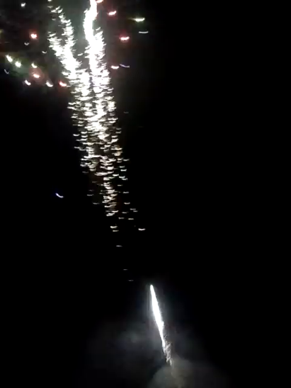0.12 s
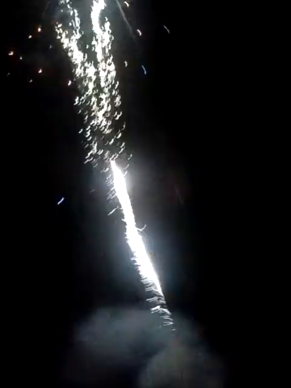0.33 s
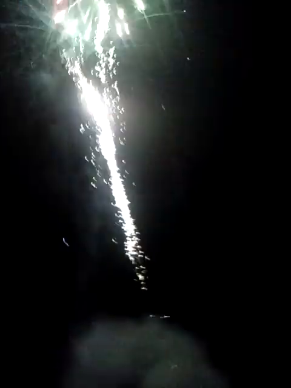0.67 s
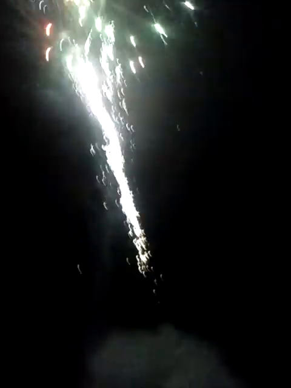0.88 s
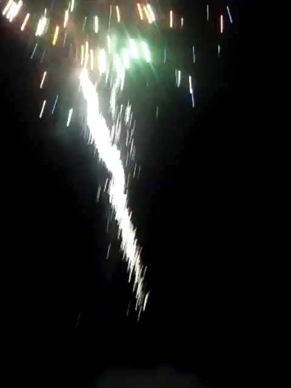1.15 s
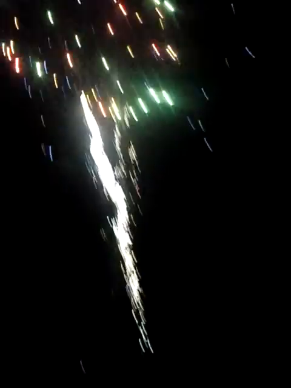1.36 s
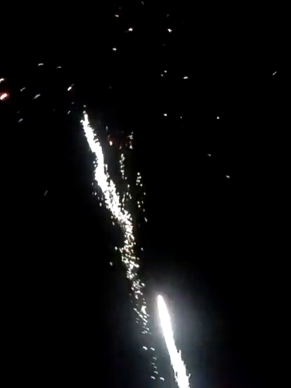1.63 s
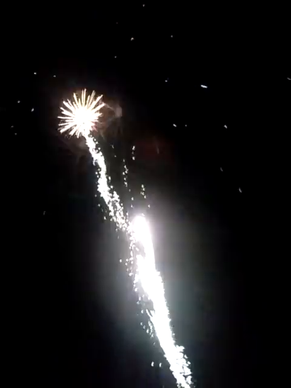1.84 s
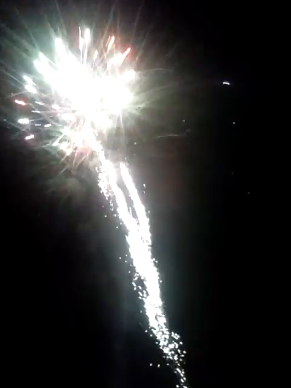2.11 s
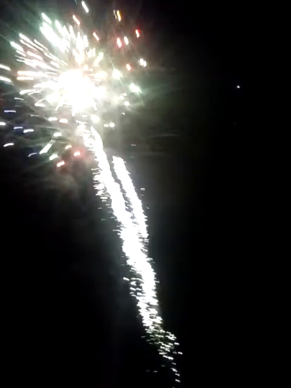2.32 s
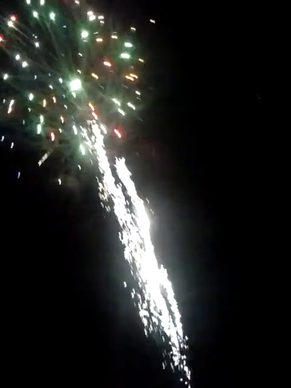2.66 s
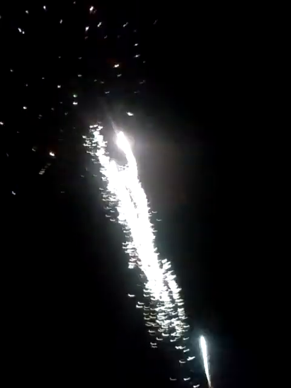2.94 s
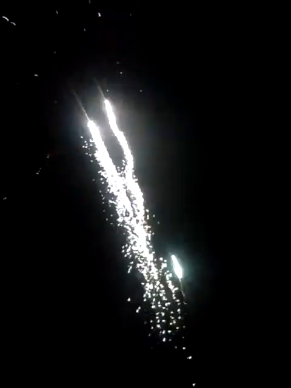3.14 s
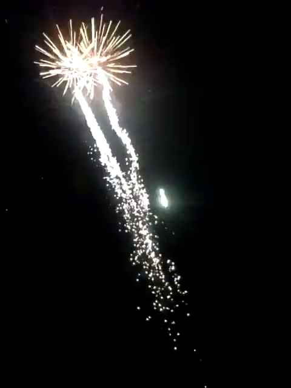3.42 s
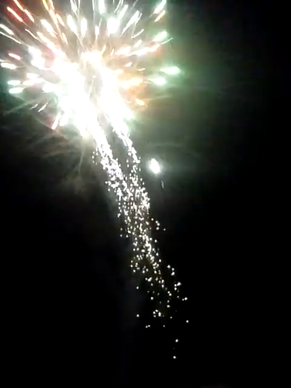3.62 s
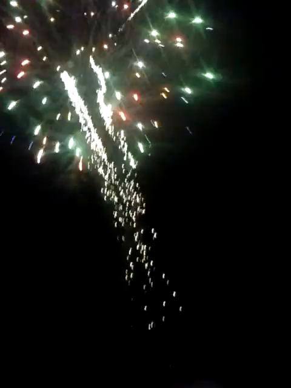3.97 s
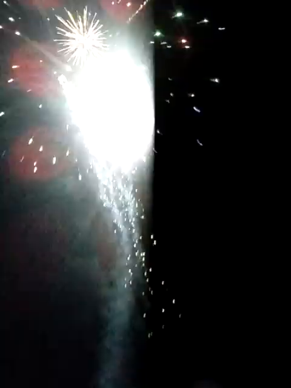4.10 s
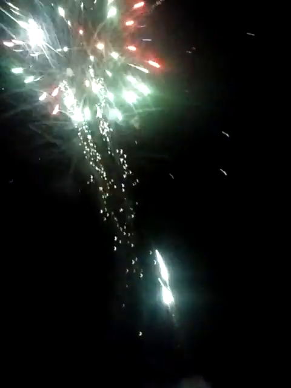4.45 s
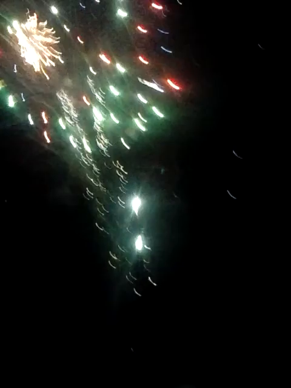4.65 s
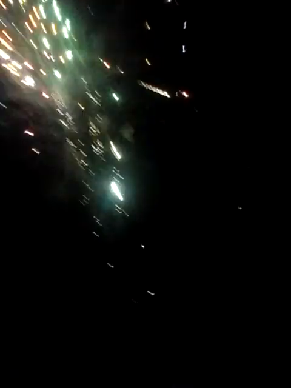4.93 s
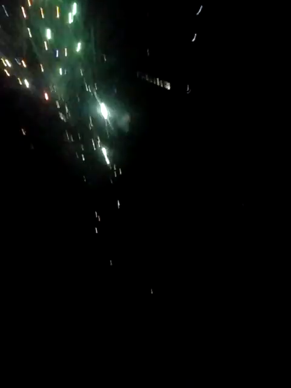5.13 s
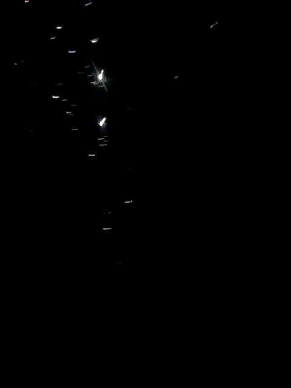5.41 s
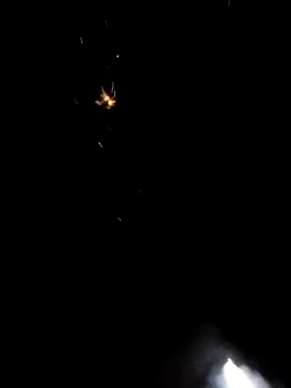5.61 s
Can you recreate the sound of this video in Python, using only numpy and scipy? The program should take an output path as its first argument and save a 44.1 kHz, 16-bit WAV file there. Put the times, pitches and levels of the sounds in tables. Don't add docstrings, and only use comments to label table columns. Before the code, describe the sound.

A battery of small fireworks fires in clusters: short hollow tube thumps with sharp cracks, then dry, ragged overhead bangs about half a second later. Muffled slaps return from houses, over low rolling rumble and fine sizzling crackle. A distant battery thuds weakly in the second half and one rocket whistles faintly. The mono phone sound is narrow, without bright treble, and overloads flat on the blasts.

```python
import sys
import numpy as np
from scipy import signal
from scipy.fft import rfft, irfft
from scipy.io import wavfile
from scipy.ndimage import uniform_filter1d

SR = 44100
rng = np.random.default_rng(int(sys.argv[2]) if len(sys.argv) > 2 else 0)


def rack_gain(trim_db):
    fader = np.asarray(trim_db, float)
    return 10 ** (fader / 20)


def to_wav(sig):
    pcm = np.clip(np.atleast_2d(sig), -1, 1) * 32767
    pcm = np.round(pcm).astype(np.int16)
    wavfile.write(sys.argv[1], SR, pcm.T)


N = 254893
T = np.arange(SR // 2) / SR

# start_s, tube_hz, thump_db, crack_db, gas_jet_db
LIFTS = [
    (0.1864, 186, 0.5, 11.5, -5),
    (0.3649, 186, 0, 7, -3),
    (1.5566, 190, 4, 5.5, -3.5),
    (1.7123, 207, 0, 23.5, -1.5),
    (2.46, 192.3, 6.5, 11, -0.5),
    (2.5784, 194, 0.5, 15, -9.5),
]
# start_s, tube_hz, thump_db, crack_db, gas_jet_db
FAR_LIFTS = [
    (2.8372, 194, -12.5, -11, -10),
    (4.1877, 203, -13.5, -6, -11.5),
    (4.2772, 205, -9, -0.5, -9.5),
    (5.7117, 186, -8.5, 0, -10.5),
]
# start_s, extra path in s by the ground, by the near wall, by the far wall
BURSTS = [
    (.7125, .0099, .233, .441),
    (1.094, .0103, .231, .456),
    (2.1141, .0102, .241, .44),
    (2.508, .0103, .232, .439),
    (3.6427, .0103, .236, .448),
    (3.699, .0105, .237, .447),
    (4.3753, .0105, .234, .454),
    (4.4294, .0096, .256, .44),
    (4.9078, .0105, .232, .435),
]
BURST_DB = [9.6, 7.7, 9.2, 6.9, 10.5, 8.9, 9.1, 15.4, 2.05]


def band(x, hz, width):
    edges = np.clip([hz * 2 ** (-width / 2), hz * 2 ** (width / 2)], 10, .45 * SR)
    return signal.sosfilt(signal.butter(2, edges, "bandpass", fs=SR, output="sos"), x)


def low(x, hz):
    return signal.sosfilt(signal.butter(2, hz, fs=SR, output="sos"), x)


def split(x, centres):
    octave = np.log2(np.maximum(np.arange(len(x) // 2 + 1) * SR / len(x), 1))
    nodes = np.log2(np.concatenate([[centres[0] / 2], centres, [centres[-1] * 2]]))
    masks = [np.interp(octave, nodes, row) for row in np.eye(len(nodes))[1:-1]]
    return irfft(rfft(x) * np.array(masks), len(x))


def unit(x):
    return x / np.sqrt(np.mean(x ** 2))


def add(out, s, x):
    i = int(s * SR)
    out[i:i + len(x)] += x[:max(N - i, 0)]


def grains(size, spread_db):
    strength = np.minimum(rng.exponential(size=size), 4)
    return rng.standard_normal(size) * rack_gain(spread_db * strength)


def walk(rate):
    k = int(SR / rate)
    steps = np.repeat(rng.standard_normal(N // k + 1), k)
    return 1.3 * uniform_filter1d(uniform_filter1d(steps, k), k)[:N]


def blast(hz, fade, shape, late):
    return -np.cos(2 * np.pi * hz * T + late) * np.exp(-(T / fade) ** shape)


def scatter(table, place, fresh, rise):
    echoes = np.sqrt(1 - fresh) * place + np.sqrt(fresh) * grains(len(T), spread_db=0.5)
    hz, db, t60 = np.transpose(table)
    tail = 0
    for part, level_db, t60_s in zip(split(echoes, hz), db, t60):
        early = rack_gain(level_db - 60 * T / t60_s)
        late = rack_gain(level_db - 7.5 - 24 * T / t60_s)
        tail = tail + (early + late) * unit(part)
    return tail * (1 - np.exp(-(T / rise) ** 2))


def bed(table, source, flicker_db, rate):
    hz, db = np.transpose(table)
    return unit(sum(rack_gain(d + flicker_db * walk(rate)) * b for b, d in zip(split(source, hz), db)))


def afterglow():
    # after_lift_db, after_burst_db, rise_s, fall_db_per_s, night_floor_db
    glow = (-34, -28.5, 0.2, 30, -61.5)
    lift_db, burst_db, rise_s, fall, floor_db = glow
    shots = [(shot[0], lift_db) for shot in LIFTS + FAR_LIFTS]
    shots += [(-0.11, burst_db)]
    shots += [(shot[0], burst_db + 0.3 * (db - 9.5)) for shot, db in zip(BURSTS, BURST_DB)]
    s, db = np.transpose(shots)[:, :, None]
    t = np.arange(0, N / SR + .01, .005)
    age = np.maximum(t - s, 0)
    left = rack_gain(2 * (db - fall * age)) * (1 - np.exp(-age / rise_s))
    power = rack_gain(2 * floor_db) + np.sum(left, axis=0)
    return np.interp(np.arange(N) / SR, t, 10 * np.log10(power))


def air():
    # band_hz, density_db (per Hz)
    rumble_bands = [(40, -27), (70, 5), (113, 4.5), (230, 9.5), (400, 5), (600, 1.5), (850, -20)]
    # band_hz, density_db (per Hz)
    sizzle_bands = [(700, 10.5), (1500, 12), (2350, 13.5), (3300, 8), (4500, 6), (5100, 0), (6100, 4.5),
                    (7200, -4)]
    # time_s, sizzle_db
    tails = [(0, -49.5), (.2, -52.5), (.7, -53), (.92, -50), (1.45, -50.5), (1.9, -52.5), (2.22, -50.5),
             (2.9, -51), (3.1, -53), (3.64, -57.5), (3.78, -49), (4.1, -50.5), (4.3, -52), (4.5, -47.5),
             (4.88, -50.5), (5.26, -52), (5.78, -56)]
    # time_s, pitch_hz, level_db
    rocket = [
        (3.82, 616, -70),
        (3.899, 665, -59),
        (3.97, 695, -56),
        (4.15, 705, -65),
        (4.19, 690, -85),
    ]
    t = np.arange(N) / SR
    rumble_db, sizzle_db = afterglow(), np.interp(t, *np.transpose(tails))
    rumble = bed(rumble_bands, rng.standard_normal(N) * rack_gain(2.1 * walk(64)), flicker_db=2.5, rate=6.1)
    sizzle = bed(sizzle_bands, grains(N, spread_db=0.4) * rack_gain(0.86 * walk(14)), flicker_db=1.66, rate=11)
    dull = low(sizzle, 3500)
    sizzle = dull + rack_gain(1.1 * (sizzle_db + 52)) * (sizzle - dull)
    time_s, hz, db = np.transpose(rocket)
    pitch = np.interp(t, time_s, hz) * (1 + 0.014 * walk(47))
    whistle_db = np.interp(t, time_s, db, left=-200, right=-200) + 6
    whistle = rack_gain(whistle_db) * np.sin(2 * np.pi * np.cumsum(pitch) / SR)
    return rack_gain(rumble_db - 8.0) * rumble + rack_gain(sizzle_db + 3.0) * sizzle + whistle


def thuds():
    # start_s, peak_db, pitch_hz
    strays = [(0.007, -28.5, 270), (0.067, -53, 200), (1.266, -36, 410), (2.99, -61, 149),
              (3.101, -45, 153), (3.831, -30.5, 232), (4.638, -31, 377), (5.428, -38, 282),
              (5.428, -36, 1820), (5.491, -48, 417)]
    # lag_s, level_db, pitch_hz
    lift_echoes = [(.31, -39, 250), (.429, -45, 153)]
    # lag_s, level_db, pitch_hz
    burst_echoes = [(.352, -41, 285)]
    out = np.zeros(N)
    echoes = [(shot[0] + lag, db, hz) for shot in LIFTS for lag, db, hz in lift_echoes]
    echoes += [(shot[0] + lag, db - 8, hz) for shot in FAR_LIFTS for lag, db, hz in lift_echoes]
    echoes += [(shot[0] + lag, db, hz) for shot in BURSTS for lag, db, hz in burst_echoes]
    for s, db, hz in strays + echoes:
        swing = blast(hz, fade=1.4 / hz, shape=1.5, late=-.5)
        add(out, s, rack_gain(db + 1.5) * low(swing, 2.2 * hz))
    return out


def lifts():
    # flash_lead_s, flash_db, scatter_db
    batteries = [
        (.0042, -34, -15),
        (.008, -29.5, -27.5),
    ]
    # band_hz, level_db, t60_s
    houses = [(90, -7, 0.12), (190, -7, 0.12), (340, -7.5, 0.092), (565, 7.5, 0.065), (944, -8.5, 0.13),
              (1740, -6.5, 0.074), (3040, -31.5, 0.38), (5250, -21, 0.17)]
    wall_lag_s = .0057
    out, place = np.zeros(N), grains(len(T), spread_db=4.5)
    rows = [shot + battery for shots, battery in zip((LIFTS, FAR_LIFTS), batteries) for shot in shots]
    for s, hz, thump_db, crack_db, jet_db, lead, flash_db, scatter_db in rows:
        ring = blast(hz, fade=0.012, shape=1.64, late=0.0075)
        overtone = blast(hz * 3.217, fade=0.0071, shape=1.1, late=0.29)
        heave = blast(hz * 0.34, fade=0.02, shape=1.0, late=0.72)
        heave = heave + rack_gain(-5.5) * blast(55, fade=0.0068, shape=0.75, late=1.9)
        add(out, s, rack_gain(thump_db) * (low(ring, 1500) + rack_gain(-15) * heave + rack_gain(-6.5) * overtone))

        crack = rack_gain(crack_db) * blast(330, fade=.0008, shape=1., late=0.)
        add(out, s, crack)
        add(out, s + wall_lag_s, rack_gain(-5) * crack)

        direct = rack_gain(-7.5) * np.exp(-T / 0.0027)
        back = np.exp(-((T - wall_lag_s - .0012) / .0019) ** 2) + rack_gain(-9) * np.exp(-T / .012)
        hiss = unit(low(band(grains(len(T), spread_db=3.5), 2920, 1.86), 4400))
        add(out, s, rack_gain(jet_db) * (direct + back) * hiss)

        flash = (T < lead) * (np.exp(-T / .002) + .5)
        flash = rack_gain(flash_db) * flash * unit(band(rng.standard_normal(len(T)), 2300, 2.4))
        add(out, s - lead, flash)
        add(out, s - lead + wall_lag_s, rack_gain(5) * flash)
        puff = low(blast(230, fade=.004, shape=1.5, late=-.6), 900)
        add(out, s - lead, rack_gain(thump_db - 24) * puff)

        add(out, s, rack_gain(scatter_db) * scatter(houses, place, fresh=0.38, rise=0.0081))
    return out


def bursts():
    # band_hz, level_db, t60_s
    houses = [(91, -7.5, 0.069), (186, 2, 0.046), (364, -9, 0.14), (523, -11.5, 0.12), (1000, -2.5, 0.069),
              (1584, -3.5, 0.065), (2920, -14, 0.11), (5850, -9, 0.062)]
    yard_lags = [.0084, .0156, .0236, .0296]
    yard_levels = [-15.5, -30, -23, -25.5]
    usual_ground_s = .0103
    out, place = np.zeros(N), grains(len(T), spread_db=4.5)
    for db, (s, ground, near, far) in zip(BURST_DB, BURSTS):
        scatter_db = -19.5 + 0.77 * db
        near_db, far_db = -25 - 0.72 * db, -18 - 0.86 * db
        shock = blast(367, fade=0.0016, shape=2.13, late=0.)
        wake = blast(185, fade=.0045, shape=1.5, late=2.8)
        heave = blast(50, fade=.008, shape=1.5, late=2.2)
        ragged = unit(low(band(grains(len(T), spread_db=2.5), 1830, 3.4), 2740))
        debris = np.exp(-((T - .0035) / 0.0018) ** 2) * ragged
        shock = rack_gain(db) * (shock + rack_gain(-15.5) * wake + rack_gain(-13) * debris + rack_gain(-26) * heave)
        add(out, s, shock)
        add(out, s + ground, rack_gain(-0.5) * low(shock, 6600))
        for lag, yard_db in zip(yard_lags, yard_levels):
            add(out, s + lag * ground / usual_ground_s, rack_gain(yard_db) * low(shock, 2000))
        tail = rack_gain(scatter_db) * scatter(houses, place, fresh=.5, rise=.005)
        add(out, s + .002, rack_gain(-11) * tail)
        add(out, s + ground, tail)
        add(out, s + near, rack_gain(near_db) * (low(shock, 420) + rack_gain(2) * low(tail, 3500)))
        far_return = rack_gain(-1.5) * low(tail, 500) - rack_gain(1.5) * band(shock, 218, 0.74)
        add(out, s + far, rack_gain(far_db) * far_return)
    return out


def sputters():
    # lag_s, level_db, half_length_s, centre_hz
    crackle = (.015, -51, .024, 2700)
    # peak_s, level_db, half_length_s, centre_hz
    bright_swell = (2.77, -44, .025, 3800)
    out = np.zeros(N)
    lag, *returned = crackle
    for s, db, half, hz in [bright_swell] + [(s + near + lag, *returned) for s, ground, near, far in BURSTS]:
        swell = np.exp(-((T - 2 * half) / half) ** 2)
        noise = unit(band(grains(len(T), spread_db=1.5), hz, 1.2))
        add(out, s - 2 * half, rack_gain(db) * swell * noise)
    return out


def scene():
    return (air() + thuds() + lifts() + bursts() + sputters())[None]


def roll_off(x):
    return signal.sosfilt(signal.butter(12, 16980, fs=SR, output="sos"), x)


def record(dry):
    overload, ceiling = 0.62, 0.67
    gain_db, squeeze_db, recover_s = 2.13, -125, .5
    x = signal.sosfilt(signal.butter(1, 35, "high", fs=SR, output="sos"), dry)
    x = np.clip(x, -overload, overload)
    x = signal.sosfiltfilt(signal.cheby1(5, .6, 7000, fs=SR, output="sos"), x)
    keep = np.exp(-1 / (recover_s * SR))
    heard = signal.lfilter([1 - keep], [1, -keep], x ** 2)
    x = x * rack_gain(gain_db + squeeze_db * heard)
    x = np.clip(x, -ceiling, ceiling)
    x = signal.sosfiltfilt(signal.ellip(6, .1, 50, 16200, fs=SR, output="sos"), x)
    return roll_off(x)


dry = scene()
out = record(dry)
to_wav(out)
```